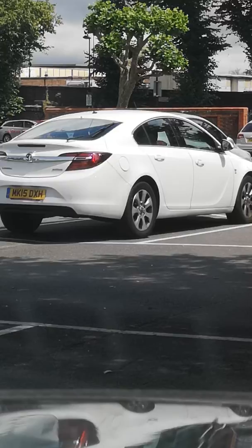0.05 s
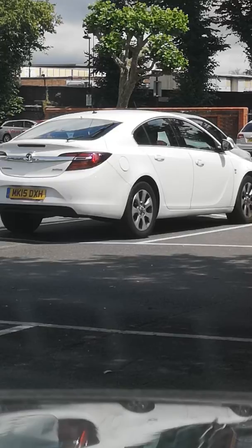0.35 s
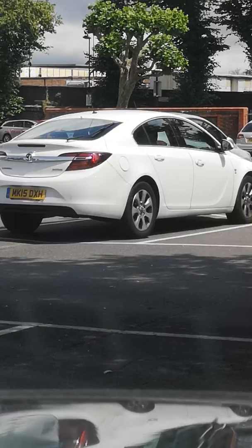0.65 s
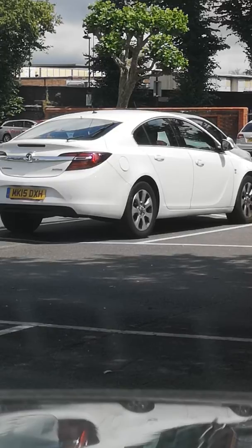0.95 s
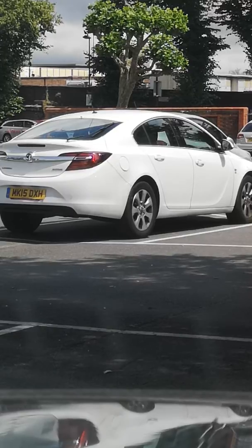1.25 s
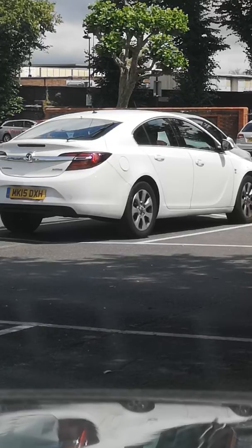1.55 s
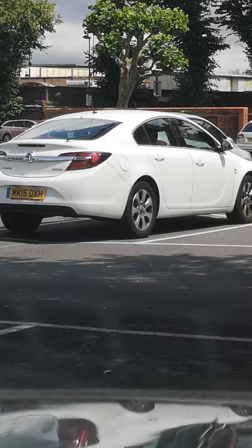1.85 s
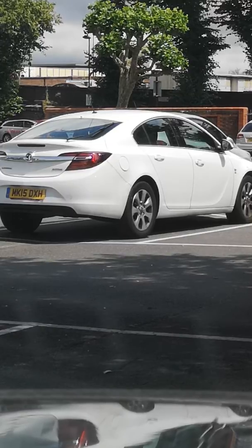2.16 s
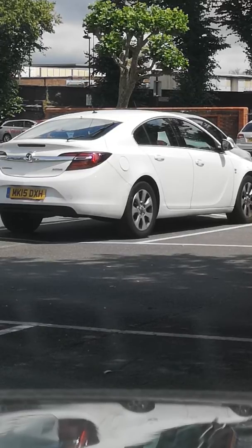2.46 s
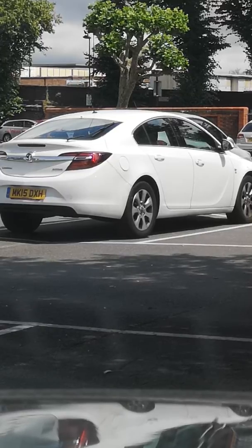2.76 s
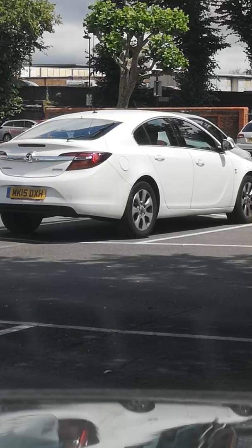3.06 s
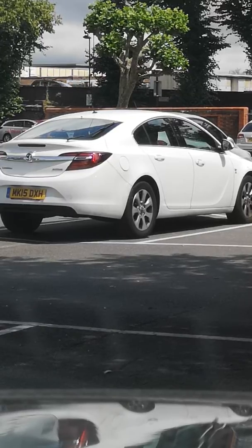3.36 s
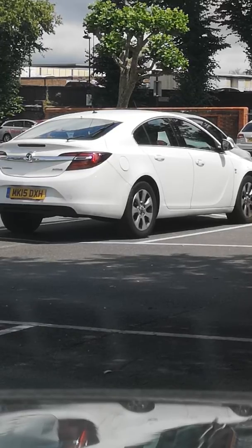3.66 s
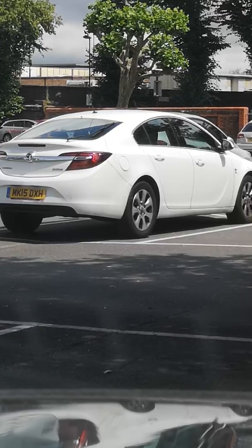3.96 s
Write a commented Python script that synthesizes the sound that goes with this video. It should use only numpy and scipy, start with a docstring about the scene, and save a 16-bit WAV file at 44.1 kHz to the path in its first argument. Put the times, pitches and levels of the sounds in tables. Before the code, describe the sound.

Inside a parked car, a muffled traffic rumble carries a few soft bumps and faint knocks. Then the door opens close by: the handle rattles, the latch snaps twice, the door thumps and outdoor noise slips in.

```python
"""Opening a car door from inside

A parked car rumbles with distant traffic. Soft bumps make its body boom, and handling makes faint
knocks. Then the handle takes up its slack and the steel latch snaps twice. The door thumps free of
its seal and rings through the cabin, and the noise of the car park comes in through the gap."""
import sys
import numpy as np
from scipy import signal
from scipy.fft import rfft, irfft
from scipy.io import wavfile
from scipy.ndimage import uniform_filter1d

SR = 44100
rng = np.random.default_rng(int(sys.argv[2]) if len(sys.argv) > 2 else 0)


def wav_record(signal):
    """Record a signal, one row per channel, as 16-bit PCM in the file named by sys.argv[1]."""
    frames = np.transpose(np.atleast_2d(signal))
    bounded = np.clip(frames, -1, 1)
    # unit amplitude maps onto the largest positive 16-bit level
    quanta = np.round(bounded * 32767).astype(np.int16)
    wavfile.write(sys.argv[1], SR, quanta)


N = 176400  # 4 seconds

# How alike the background is in both ears. Each row: pitch in Hz, likeness from 0 to 1.
AIR_LIKENESS = [(60, 1), (130, 0.99), (260, 0.97), (550, 0.22), (1150, 0.46), (2400, 0), (12000, 0)]


def undb(db):
    """Turn decibels into a number to multiply by."""
    return 10 ** (np.asarray(db) / 20)


def unit(x):
    """Scale a signal to an average power of 1."""
    return x / np.sqrt(np.mean(x ** 2))


def on_log(points, size):
    """Draw a curve through (Hz, value) points, one value for each frequency of a spectrum."""
    hz, value = np.array(points, float).T
    return np.interp(np.log(np.fft.rfftfreq(size, 1 / SR) + 1), np.log(hz), value)


def colour(x, points):
    """Shape the tone with a curve of (Hz, dB) points."""
    n = x.shape[-1]
    cepstrum = irfft(np.log(undb(on_log(points, n))), n)
    cepstrum[1:n // 2] *= 2  # folding makes the filter ring after a hit, not before
    cepstrum[n // 2 + 1:] = 0
    return irfft(rfft(x) * np.exp(rfft(cepstrum)), n)


def stereo_noise(size, likeness):
    """White noise, as alike in both ears as the (Hz, 0 to 1) points say."""
    alike = np.clip(on_log(likeness, size), 0, .9995)
    mid, side = rfft(rng.standard_normal((2, size)))
    side = np.array([side, -side]) * np.sqrt((1 - alike) / 2)
    return irfft(mid * np.sqrt((1 + alike) / 2) + side, size)


def fade(t, ring_s):
    """Die away by 60 dB in the ring time, ring_s."""
    return np.exp(-np.log(1000) * t / ring_s)


def drift(rate_hz):
    """Wander slowly at random, by about 1 either way."""
    hold = int(SR / rate_hz)
    steps = np.repeat(rng.standard_normal(N // hold + 1), hold)
    return unit(uniform_filter1d(uniform_filter1d(steps, hold), hold)[:N])


def add(out, start, sound):
    """Mix a sound in at start seconds."""
    i = max(int(start * SR), 0)
    out[:, i:i + sound.shape[-1]] += sound[..., :max(N - i, 0)]


def two_ears(x, lag_s=.0001):
    """The same sound on both sides, a little later on the right."""
    t = np.arange(len(x)) / SR
    return np.array([x, np.interp(t - lag_s, t, x, left=0)])


def ringing_tone(hz, db, ring_s, build_s):
    """One second of a vibration that builds up and dies away."""
    t = np.arange(SR) / SR
    return undb(db) * (1 - np.exp(-t / build_s)) * fade(t, ring_s) * np.sin(2 * np.pi * hz * t)


def cabin_rumble(level_db=-51, waver_db=0.57):
    """Distant traffic through the closed body: a wavering rumble under a faint, steady hiss."""
    # Tone of the rumble and hiss. Each row: pitch in Hz, relative level in dB.
    cabin_tone = [(12, -0.5), (20, -5.5), (38, 2), (52, -3.5), (72, -8), (95, -6.5), (130, -15),
                  (184, -11.5), (240, -21), (356, -29.5), (540, -40), (700, -39), (970, -32), (1150, -37.5),
                  (1280, -34), (1450, -39), (1720, -34.5), (2100, -38.5), (2600, -40), (4150, -48.5),
                  (5500, -48.5), (8000, -53), (11500, -57), (15500, -58)]
    air = undb(level_db) * unit(colour(stereo_noise(N, AIR_LIKENESS), cabin_tone))
    rumble = signal.sosfiltfilt(signal.butter(2, 350, fs=SR, output="sos"), air)
    return air + rumble * (undb(waver_db * drift(rate_hz=7.29)) - 1)


def body_booms():
    """Soft bumps swing the car body and the air in it for a few cycles."""
    # Each row: start in seconds, level in dB, pitch in Hz, ring time in seconds.
    bumps = [(0., -23, 112, 0.08), (0.029, -24.5, 95, 0.2), (0.068, -27, 60.5, 0.17),
             (0.666, -36.5, 52, 0.17), (1.038, -47.5, 355, 0.084), (1.167, -29, 45, 0.049),
             (1.55, -52.5, 310, 0.11), (3.673, -23, 50, 0.21), (3.837, -23, 4.23, 1),
             (3.854, -12, 120, .06), (3.908, -15.5, 89, 0.14)]
    out = np.zeros((2, N))
    for start, db, hz, ring_s in bumps:
        add(out, start, two_ears(ringing_tone(hz, db, ring_s, build_s=.005)))
    return out


def contacts(rows, steel_gain):
    """Parts hit each other: a crack, brief chatter and a cabin echo. Steel parts also ring."""
    # The four bands of a hit. Each row: centre in Hz, width in Hz.
    hit_bands = [(350, 350), (1000, 1050), (2800, 2600), (7000, 5500)]
    # Tone of the cabin and its trim. Each row: pitch in Hz, boost in dB.
    trim_tone = [(60, -18.5), (200, 1), (380, 4.5), (570, -5.5), (800, 0), (1050, 4), (1600, -3),
                 (2300, 0.5), (3400, -1.5), (4300, -1), (6200, 0), (7200, -2), (8700, -2), (10300, -9.5),
                 (11200, -20), (12000, -30), (16000, -33)]
    # Notes of the steel latch. Each row: pitch in Hz, relative level in dB, ring time in seconds.
    steel_notes = [(1087, 2, 0.044), (1215, 1, 0.048), (2170, -9, 0.16), (2312, -16, 0.21),
                   (2670, 0, 0.062), (3200, 4, 0.027), (3430, 2, 0.05), (5500, -14, 0.12), (6200, -7, .04)]
    rise_s, right_lag_s, peak_width = 0.00044, .00012, 0.092
    likeness = [(400, 1.0), (1100, 0.24), (8000, 0.24)]
    out, t = np.zeros((2, N)), np.arange(2 ** 14) / SR
    centres, widths = np.array(hit_bands).T
    for start, low, mid, high, top, ring_s, crack, pan_db, peak_hz, peak_db in rows:
        hit = stereo_noise(len(t), likeness) * (1 - np.exp(-t / rise_s))
        chatter = 1.05 * fade(t, ring_s=0.011)
        hit *= fade(t, ring_s) + chatter
        # The crack is one sharp spike in each ear.
        hit[[0, 1], [0, int(right_lag_s * SR)]] -= crack * np.sqrt(np.sum(hit ** 2) / 2)
        band_db = np.array([low, mid, high, top]) + 10 * np.log10(SR / 2 / widths)
        peak = zip(peak_hz * np.exp(peak_width * np.array([-2, 0, 2])), [0, peak_db, 0])
        for curve in (zip(centres, band_db), trim_tone, peak):
            hit = colour(hit, list(curve))
        for hz, db, steel_ring_s in steel_notes:
            note = np.sin(2 * np.pi * hz * t + rng.normal(0, .8, (2, 1)))
            hit += steel_gain * undb(high + db) * fade(t, steel_ring_s) * note
        add(out, start, hit * undb(np.array([[pan_db], [-pan_db]]) / 2))
    return out


def handling_knocks():
    """Handling makes faint knocks and ticks, with no ring of steel."""
    # Each row: start in seconds, four band levels in dB (350, 1000, 2800 and 7000 Hz), ring time in
    # seconds, crack from 0 to 1, left minus right in dB, a tone peak in Hz, its boost in dB.
    knock_hits = [(0.085, -87, -71, -71.5, -79, 0.14, .1, 0, 5500, 2),
                  (1.038, -59.5, -67, -73, -87, 0.07, 0.4, 1, 940, 9.9),
                  (1.545, -64.5, -65.5, -72.5, -87, 0.12, 0.43, 0, 2700, 2.1),
                  (2.164, -60, -75, -72, -94, 0.046, 0.22, 0, 664, 6.3),
                  (2.732, -69, -62, -64.5, -79, 0.084, 0.31, 0, 2430, 12),
                  (2.815, -67, -69.5, -78, -83, 0.14, 0.089, 0, 755, 8.7),
                  (2.844, -52, -72.5, -70.5, -78, 0.22, 0.051, 0, 710, 7.8),
                  (2.9535, -89, -73, -84, -71, 0.05, .5, 1, 10500, 11),
                  (3.430, -61.5, -68, -74, -87, .12, 0.082, 0.091, 500, 8.6)]
    return contacts(knock_hits, steel_gain=0)


def door_latch():
    """The handle takes up its slack, then the steel latch snaps twice."""
    # Hits inside the latch. Each row reads as in handling_knocks.
    latch_hits = [(3.678, -52.5, -55.5, -68, -87, .15, 0.06, -1, 1170, 3),
                  (3.694, -46.5, -54, -47, -60.5, 0.19, 0.2, 0.5, 5400, 11),
                  (3.709, -43.5, -48.5, -51, -70, 0.16, 0.13, -1, 920, 4),
                  (3.729, -39, -50, -55, -73, 0.094, 0.3, -0.5, 393, 0),
                  (3.7627, -38, -39, -37.5, -36.5, 0.061, 0.63, 2.5, 2240, 5.5),
                  (3.7662, -51, -50, -38, -70, 0.078, 0.36, -5, 1280, 10),
                  (3.793, -46.5, -46.5, -50, -60, 0.24, 0.3, 1, 2260, 5),
                  (3.811, -48.5, -53, -54, -67, 0.12, 0.15, 2, 690, 3),
                  (3.8353, -34, -37.5, -32, -41.5, 0.056, 0.32, -1, 3420, 9)]
    return contacts(latch_hits, steel_gain=undb(-12))


def door_thump():
    """Pushes make the door panel and cabin air ring; a longer push sounds duller."""
    # Notes of the panel and air. Each row: pitch in Hz, level in dB, ring time in seconds.
    door_notes = [(86, -29.5, 0.8), (121.4, -24, 0.48), (166, -17, 0.13), (200.3, -35, 0.16),
                  (254, -43, .25), (309.3, -27.5, 0.14), (382.8, -39, 0.22), (417, -45.5, 0.18),
                  (508, -51, 0.32), (698, -51.5, 0.24), (830, -59, 0.16), (1032, -37.5, 0.15),
                  (1260, -54, 0.19), (1370, -64, 0.39)]
    # Pushes on the panel. Each row: start in seconds, strength in dB, contact time in seconds.
    pushes = [(3.7092, -10.5, 0.0026), (3.729, -9.5, 0.0029), (3.7622, -10.5, 0.0041),
              (3.787, -11.5, 0.0067), (3.8245, -4, 0.0067), (3.8333, 5.5, .002), (3.854, -1.5, 0.0016)]
    out, t = np.zeros((2, N)), np.arange(SR // 10) / SR
    ring = sum(ringing_tone(hz, db, ring_s, build_s=0.0025) for hz, db, ring_s in door_notes)
    for start, db, contact_s in pushes:
        push = t * np.exp(-10 * t / contact_s)
        thump = undb(db) * signal.fftconvolve(ring, push / push.sum())
        add(out, start, two_ears(thump))
    return out


def car_park_air(open_s=3.84, rise_s=.015, start_db=-46, growth_db_per_s=46):
    """Outdoor noise comes in and grows as the door gap widens."""
    # Tone of the car park. Each row: pitch in Hz, relative level in dB.
    outside_tone = [(25, 21), (60, 17.5), (100, 22.5), (200, 17.5), (330, 7), (470, 6.5), (650, -5),
                    (850, -1), (1050, 1.5), (1300, 0), (1800, -7.5), (3000, -13.5), (5000, -23),
                    (10000, -30), (15000, -40)]
    since_open = np.maximum(np.arange(N) / SR - open_s, 0)
    gap = np.minimum(since_open / rise_s, 1) * undb(growth_db_per_s * since_open)
    return undb(start_db) * gap * unit(colour(stereo_noise(N, AIR_LIKENESS), outside_tone))


def scene():
    """All the sounds together, heard inside the car."""
    return cabin_rumble() + body_booms() + handling_knocks() + door_latch() + door_thump() + car_park_air()


def record(dry):
    """Cut the highest treble, above 15700 Hz."""
    return signal.sosfilt(signal.ellip(8, .2, 70, 15700, fs=SR, output="sos"), dry)


dry = scene()
out = record(dry)
wav_record(out)
```